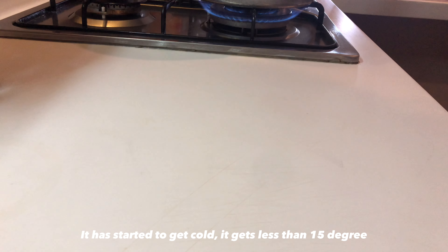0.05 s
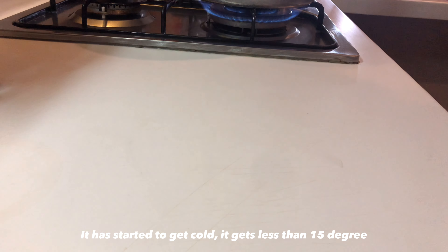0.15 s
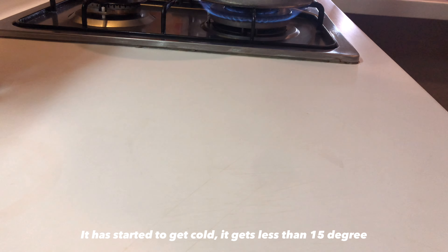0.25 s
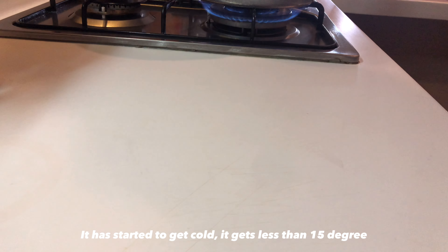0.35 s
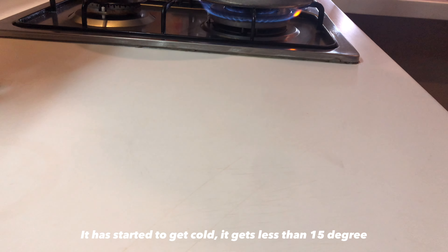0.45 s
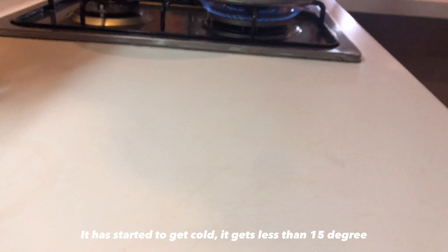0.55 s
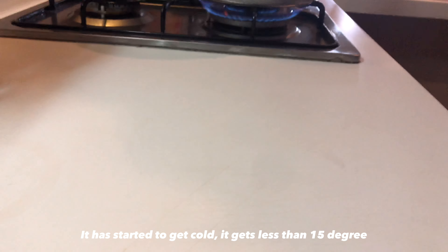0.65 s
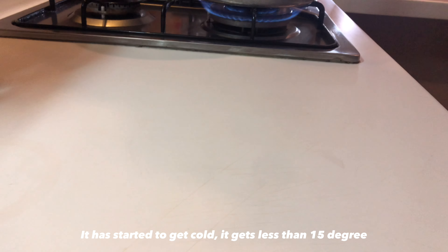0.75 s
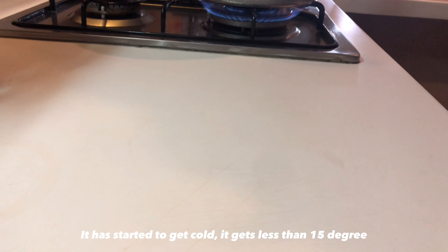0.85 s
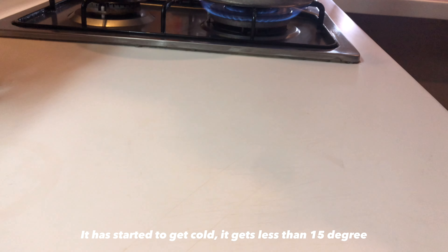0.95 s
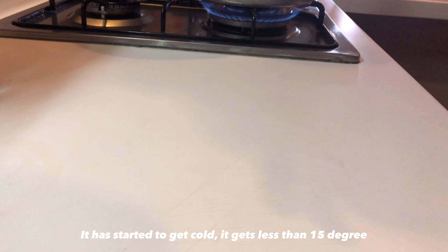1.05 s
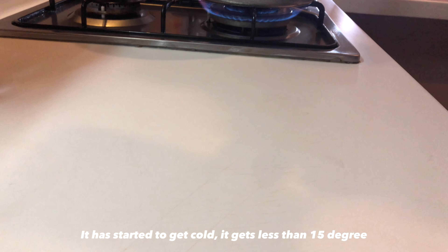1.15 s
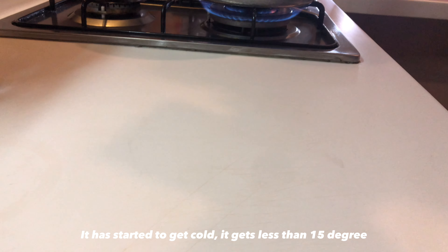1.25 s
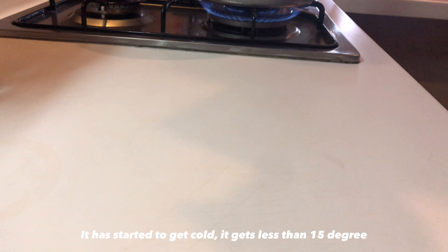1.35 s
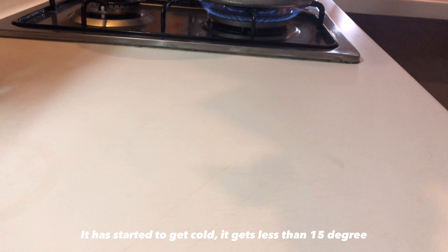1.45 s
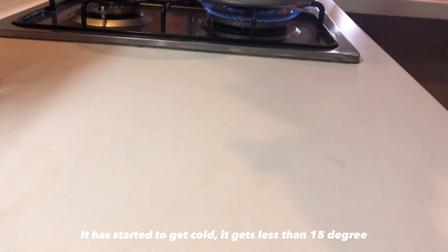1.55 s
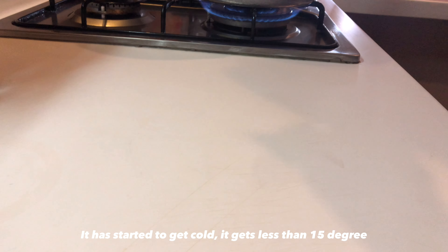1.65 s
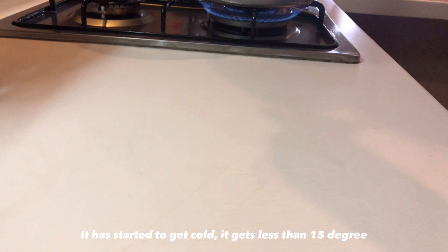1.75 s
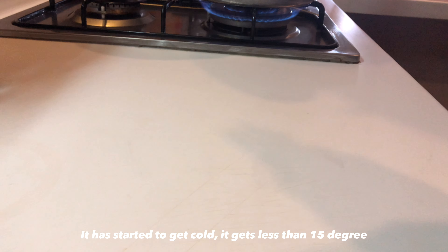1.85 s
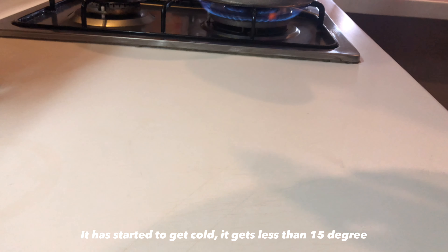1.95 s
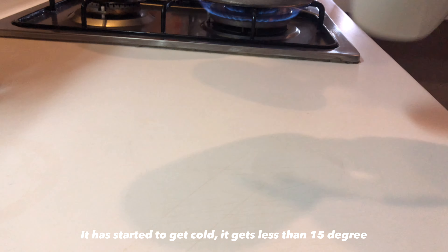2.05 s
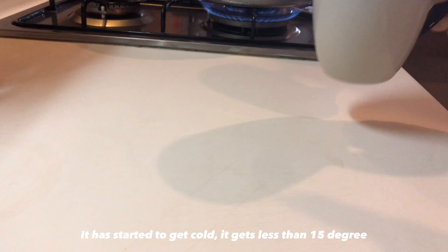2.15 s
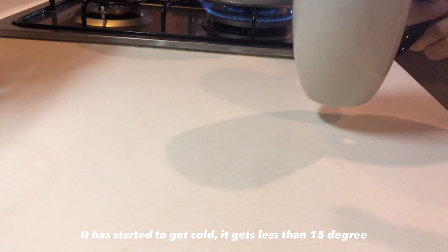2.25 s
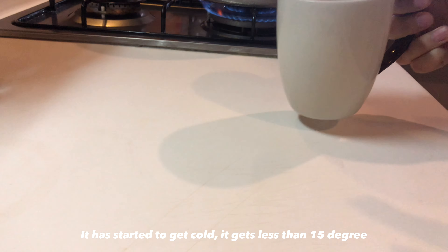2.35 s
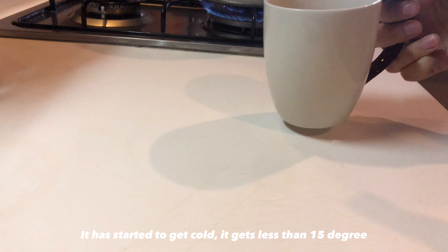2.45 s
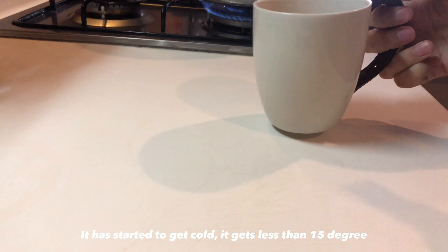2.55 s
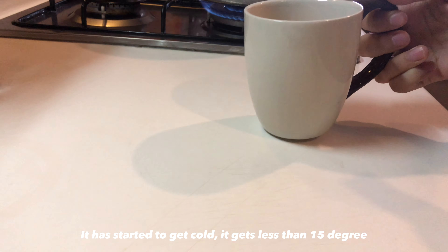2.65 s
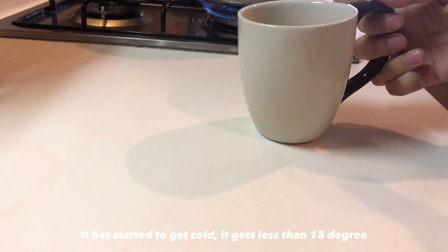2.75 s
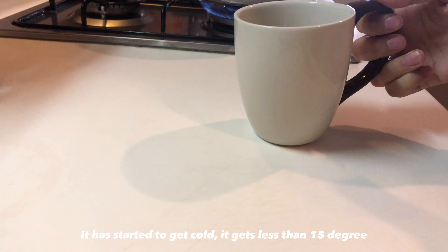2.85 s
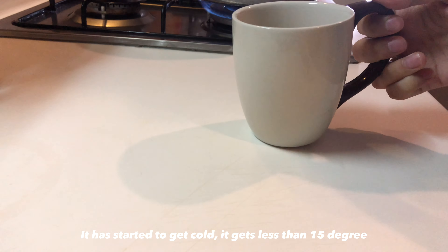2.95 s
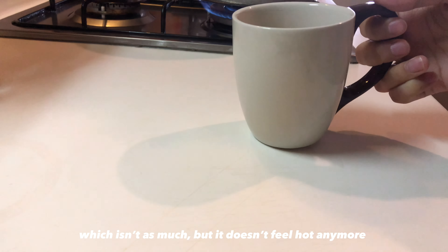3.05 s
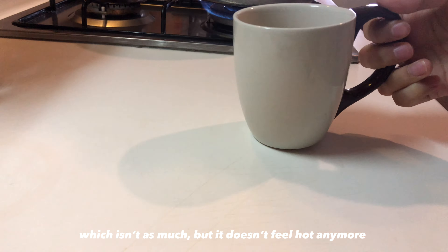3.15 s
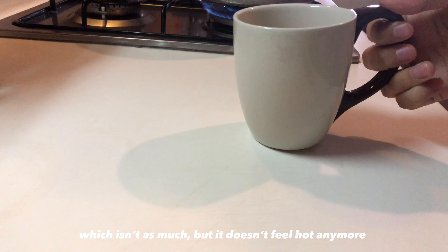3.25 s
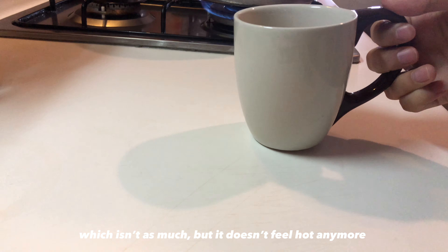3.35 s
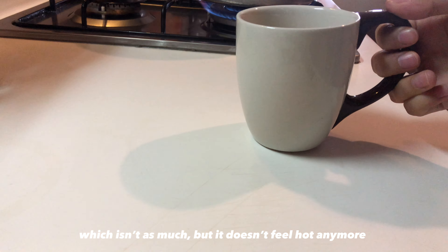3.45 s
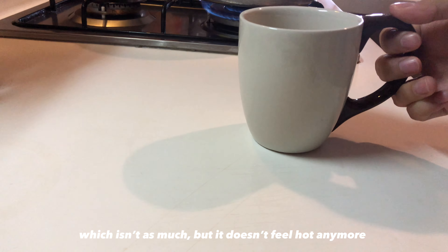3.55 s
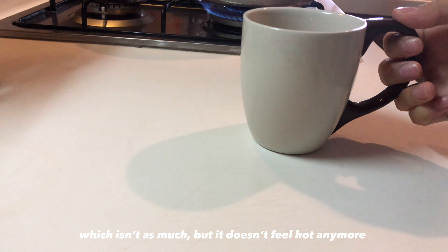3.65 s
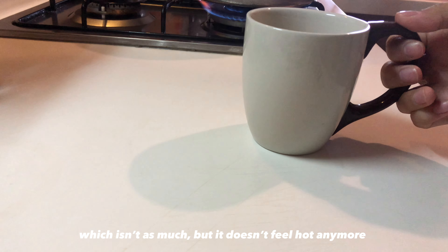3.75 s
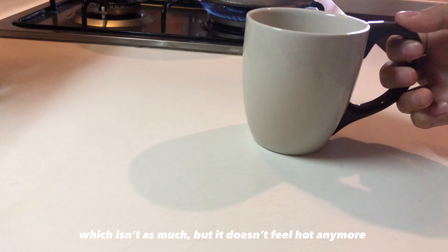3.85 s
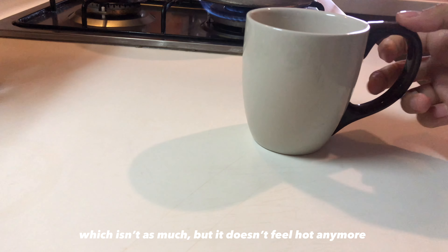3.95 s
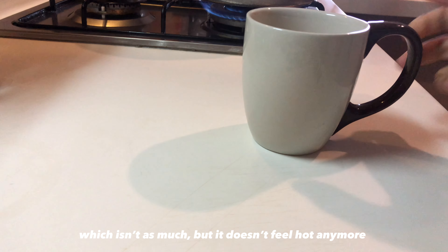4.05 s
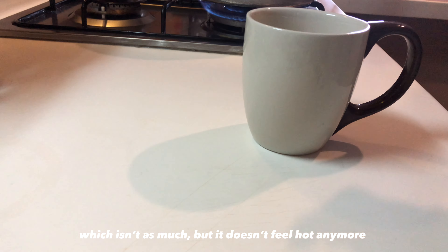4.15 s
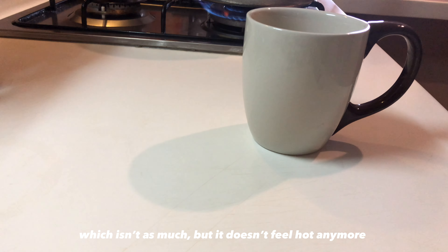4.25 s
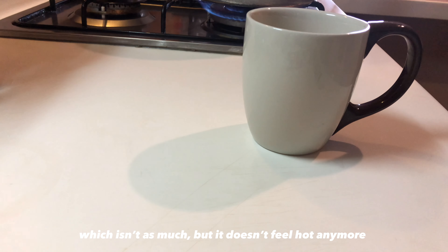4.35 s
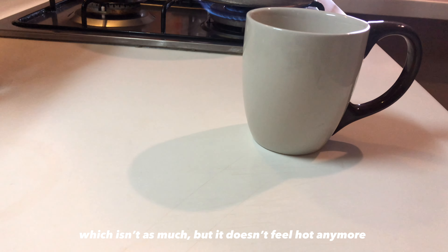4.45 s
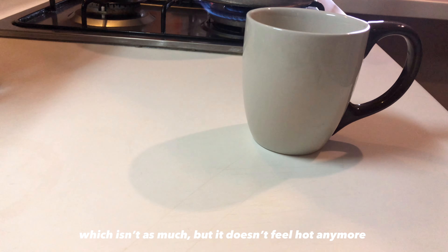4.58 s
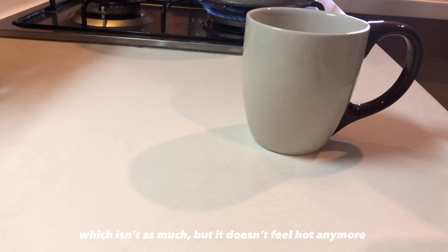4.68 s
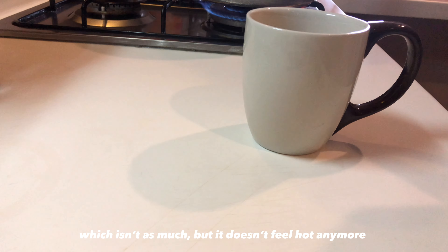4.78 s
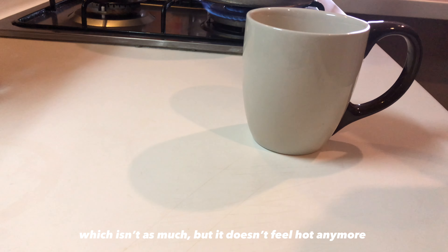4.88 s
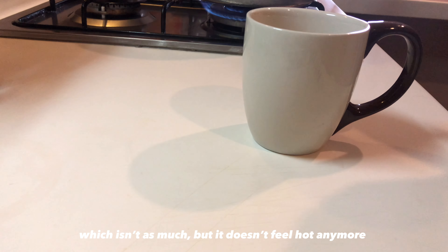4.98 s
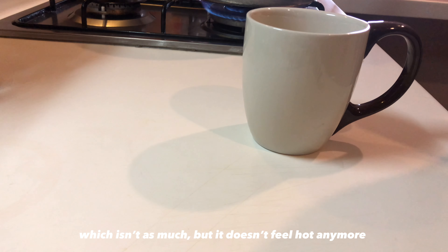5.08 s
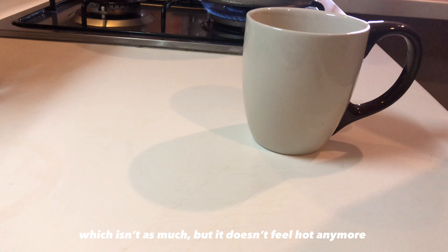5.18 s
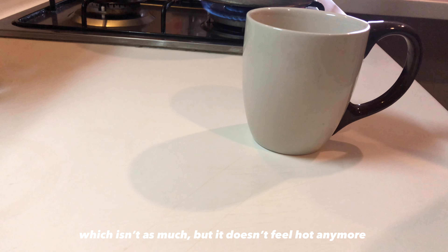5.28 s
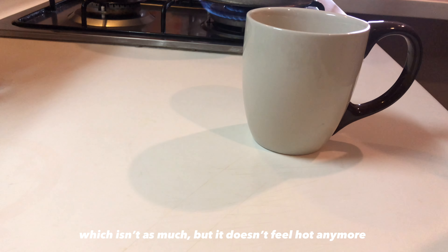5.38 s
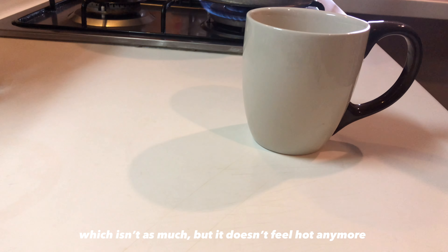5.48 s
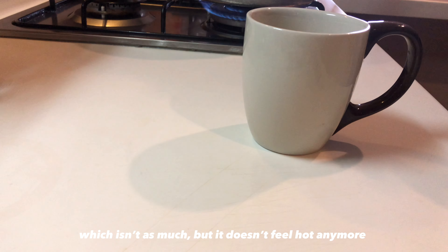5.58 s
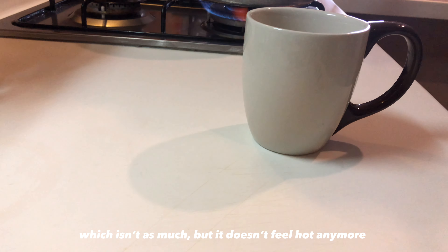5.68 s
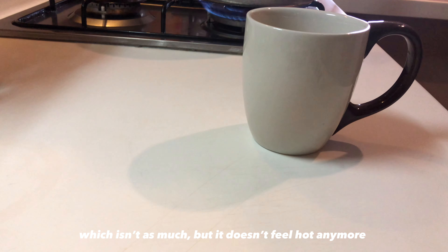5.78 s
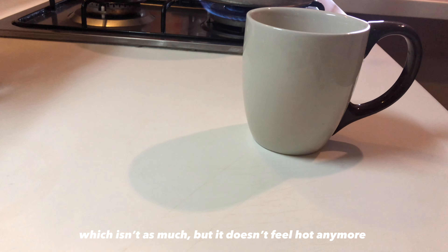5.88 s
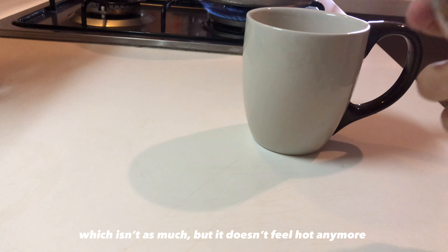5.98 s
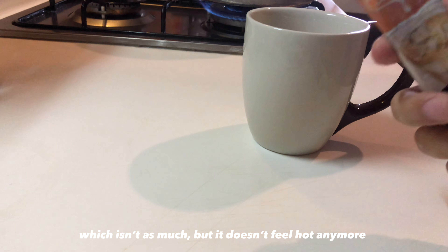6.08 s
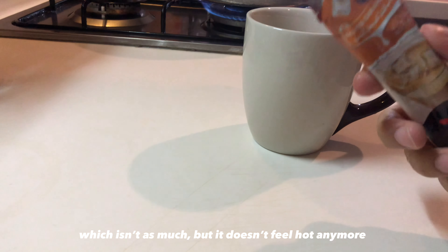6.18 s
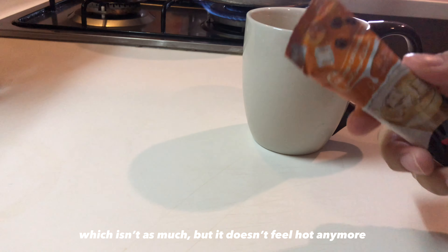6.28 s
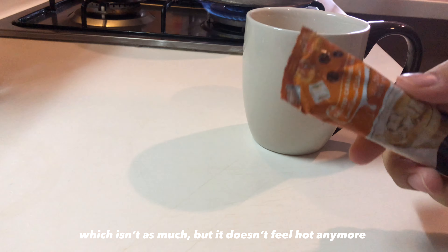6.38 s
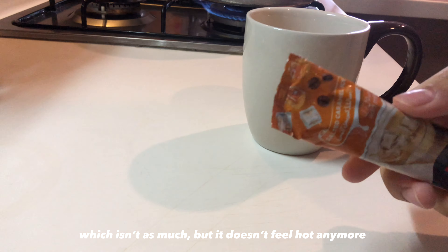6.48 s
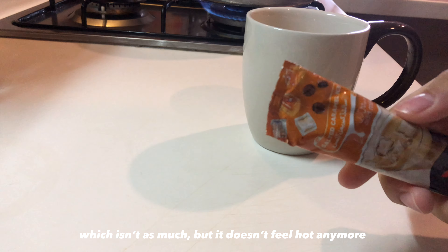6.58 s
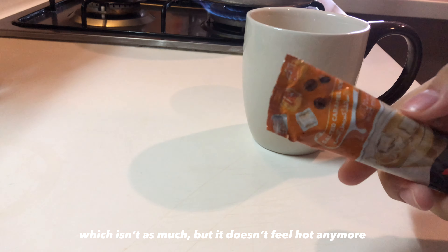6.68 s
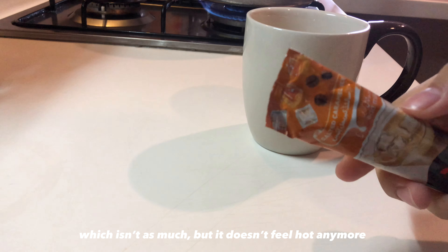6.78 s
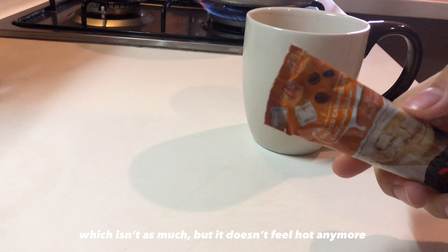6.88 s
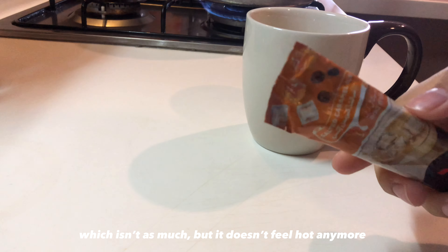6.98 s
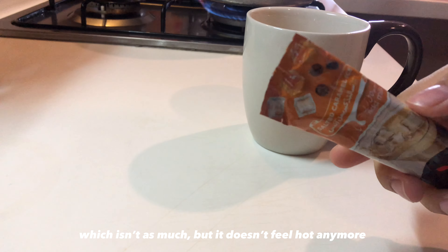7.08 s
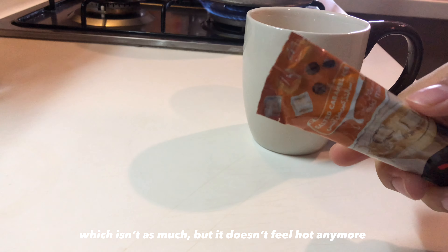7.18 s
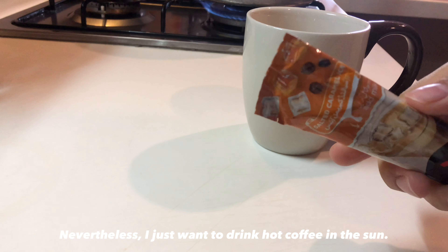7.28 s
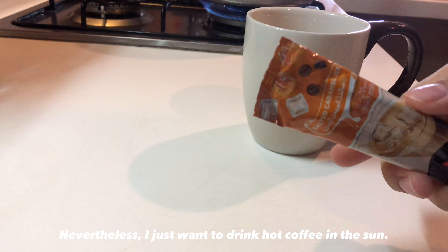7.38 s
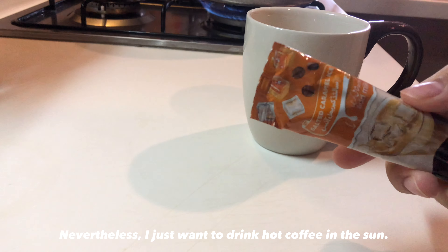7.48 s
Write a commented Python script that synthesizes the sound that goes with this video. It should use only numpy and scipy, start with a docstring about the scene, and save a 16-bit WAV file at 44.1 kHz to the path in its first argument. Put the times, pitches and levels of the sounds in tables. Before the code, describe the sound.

A gas burner hisses steadily while plastic film crackles nearby; a ceramic mug clacks onto the worktop, rocks flat, then crisp sachet crinkling bursts out.

```python
"""Kitchen counter, beside a lit gas burner: a small hard room that answers the snaps, bumps and knocks.
The flame flutters and the gas hisses as shaped noise, over faint steady hum tones.
Out of sight a plastic coffee sachet is handled: noisy bursts and short tones make each snap of the film.
Dull bumps, light taps and one distant knock are bands of noise that die away.
A ceramic mug lands on the edge of its foot and rocks flat a second later, as dying modes of mug and worktop."""
import sys
import numpy as np
from scipy import signal
from scipy.fft import rfft, irfft
from scipy.io import wavfile

SR = 44100
rng = np.random.default_rng(int(sys.argv[2]) if len(sys.argv) > 2 else 0)


def int16_out(signal):
    """Quantize to a 16-bit WAV file."""
    q = np.round(np.clip(np.atleast_2d(signal).T, -1, 1) * 32767)
    wavfile.write(sys.argv[1], SR, q.astype(np.int16))


N = 331894  # length of the scene in samples

# how long the kitchen rings on in each band: [f/Hz, t60/s]
ROOM_DECAY = [(60, 1), (200, 1), (500, 0.89), (1200, 0.51), (4000, 0.36), (15000, 0.83)]


def amp(db):
    """Turns decibels into an amplitude factor."""
    return 10 ** (np.asarray(db) / 20)


def unit(x):
    """Scales to an rms of one."""
    return x / np.sqrt(np.mean(x ** 2) + 1e-20)


def read(points, hz):
    """Joins (Hz, value) points on a log-frequency axis."""
    f, value = np.transpose(points)
    return np.interp(np.log(hz + 1), np.log(f + 1), value)


def add(mix, s, sound):
    """Mixes a sound in at time s, in seconds."""
    part = mix[round(s * SR):][:len(sound)]
    part += sound[:len(part)]


def noise(gain, size):
    """Noise of rms one whose spectrum follows the function gain(Hz)."""
    spectrum = rfft(rng.standard_normal(size))
    return unit(irfft(spectrum * gain(np.fft.rfftfreq(size, 1 / SR)), size))


def hump(hz, centre_hz, octaves):
    """A bell on the log-frequency axis."""
    return np.exp(-.5 * (np.log2((hz + 1) / centre_hz) / octaves) ** 2)


def drift(rate):
    """Slow random wavering of rms one, fading out above the rate in Hz."""
    return noise(lambda hz: np.exp(-(hz / rate) ** 2) * (hz > 0), N)


def ring(modes, t, pitch, length, rise_cycles):
    """Sums dying modes, each building up over a number of its cycles."""
    total = np.zeros(len(t))
    for hz, db, t60 in modes:
        rise = 1 - np.exp(-(t * hz / rise_cycles) ** 2)
        decay = amp(db - 60 * t / (t60 * length))
        total += decay * rise * np.sin(2 * np.pi * hz * pitch * t)
    return total


def scatter(x, decay, delay):
    """Sparse reflections of random sign, each band dying at its own speed."""
    taps = rng.choice([-1., 1.], SR) * (rng.random(SR) < 1 / 10)
    hz, t, z = signal.stft(taps, SR, nperseg=256)
    fade = amp(-60 * t / read(decay, hz)[:, None])
    tail = signal.istft(z * fade, SR, nperseg=256)[1]
    tail = np.r_[np.zeros(round(delay * SR)), tail / np.linalg.norm(tail)]
    return signal.fftconvolve(x, tail)[:N]


def soften(x, edge_hz, order=2):
    """Takes the treble off."""
    return signal.sosfilt(signal.butter(order, edge_hz, fs=SR, output="sos"), x)


def burner():
    """A fluttering flame, and gas hissing through the resonances of the mixing tube."""
    # the flame's rumble and rush, relative spectrum: [f/Hz, level/dB per Hz]
    flame_spectrum = [(25, -48), (36, -18), (48, -4), (70, -15), (110, 3.5), (132, 0), (155, -15),
                      (260, -10.5), (450, -18.5), (570, -15.5), (780, -8), (920, -6), (1300, -21.5),
                      (2500, -58.5)]
    # gas leaving the jet, relative spectrum: [f/Hz, level/dB per Hz]
    jet_spectrum = [(600, -81), (1500, 3), (2200, 0), (3000, -5.5), (3700, -6), (4700, 0.5), (5350, -2),
                    (5800, -9.5), (6500, -11), (7800, -5), (10500, -6), (12000, -13), (13000, -16),
                    (14400, -5), (15800, -19)]
    # resonances of the burner's mixing tube, on the jet's scale: [f/Hz, width/Hz, level/dB]
    tube_modes = [(2632, 132, 10), (3266, 143, 7.5), (4123, 62, 7.5), (5056, 57, 8.5), (6852, 166, 8.5),
                  (8580, 110, -3), (8855, 110, 3.5), (9624, 47, 10.5), (12130, 420, -2), (14200, 260, -3),
                  (15580, 190, -1)]
    # strength of the gas hiss: [t/s, level/dB]
    gas_level = [(0, -55.5), (2.3, -54.5), (2.8, -56), (4.2, -56), (5.6, -55.5), (7.5, -56)]
    # a sharper sizzle in the gas that falls away: [t/s, level/dB]
    sizzle_level = [(0, -64.5), (2.2, -65.5), (2.6, -88), (3.0, -80)]
    flame_db = -51.5

    def tube(hz):
        peaks = sum(amp(db) ** 2 / (1 + 2 * ((hz - f) / width) ** 2) ** 2 for f, width, db in tube_modes)
        return np.sqrt(amp(read(jet_spectrum, hz)) ** 2 + peaks)

    t = np.arange(N) / SR
    flame = noise(lambda hz: amp(read(flame_spectrum, hz)), N)
    flame *= amp(flame_db + 0.75 * drift(rate=6.8))
    hiss = noise(tube, N)
    hiss *= amp(np.interp(t, *np.transpose(gas_level)) + 0.092 * drift(rate=9.5))
    sizzle = noise(lambda hz: hump(hz, centre_hz=5100, octaves=0.072), N)
    sizzle *= amp(np.interp(t, *np.transpose(sizzle_level)))
    return flame + hiss + sizzle


def hum():
    """Steady low tones of a kitchen appliance, each a sine of random phase."""
    # faint mains hum: [f/Hz, level/dB rms]
    hum_tones = [(100, -72), (302, -69)]
    t = np.arange(N) / SR
    return sum(np.sqrt(2) * amp(db) * np.sin(2 * np.pi * (hz * t + rng.random())) for hz, db in hum_tones)


def grip():
    """Strength of the crinkling: each squeeze tightens quickly and relaxes more slowly."""
    # the fingers squeeze the sachet: [t/s at the tightest, level/dB of the crinkling]
    squeezes = [(2.13, -63), (2.41, -60), (4.53, -53), (4.69, -53), (4.82, -48), (5.089, -51.5),
                (5.43, -58), (5.66, -58.5)]
    tighten_db_per_s, relax_db_per_s = 184, 122
    t = np.arange(N) / SR
    levels = [db - np.maximum(tighten_db_per_s * (s - t), relax_db_per_s * (t - s)) for s, db in squeezes]
    return amp(np.max(levels, axis=0))


def crackle():
    """Each buckling film cracks, rings two stiff patches and sheds fizz; tiny creases follow each squeeze."""
    # crisp snaps of handled plastic: [t/s, level/dB, low ring f/Hz, high ring f/Hz, sharpness level/dB]
    snaps = [(.0718, -23.5, 3100, 4670, -14), (0.475, -25, 3080, 4350, -12), (1.6092, -29, 3670, 4860, 5),
             (1.6402, -21, 1920, 5000, -6), (2.1833, -22.5, 3140, 6700, -2),
             (2.274, -22.5, 2270, 6780, -15), (2.323, -24, 3120, 4200, 0.5), (2.5494, -15, 3400, 5550, 3.5),
             (3.582, -24, 2000, 5280, -18), (4.266, -27.5, 2180, 3820, -14), (4.4124, -28, 3450, 4000, 3.5),
             (4.4981, -15.5, 2280, 5960, -13), (4.533, -15.5, 1920, 5100, -0.5),
             (4.5686, -19, 2670, 5320, 7), (4.613, -18, 1930, 4320, 4), (4.651, -20.5, 3560, 4400, 10.5),
             (4.6625, -18, 2530, 4150, -12), (4.6774, -17, 1690, 4430, -9), (4.684, -16, 3750, 4300, -6),
             (4.6906, -16, 2650, 3870, -15), (4.752, -8.5, 1730, 4270, -6), (4.786, -17.5, 2560, 4740, -5),
             (4.7983, -17, 2370, 4660, -0.5), (4.8058, -16.5, 1680, 3660, -9),
             (4.837, -22.5, 1860, 4760, 1), (4.879, -17.5, 2320, 4180, 1), (5.0589, -25, 2350, 4800, 4),
             (5.0834, -25.5, 1700, 6630, 12), (5.0927, -19.5, 1750, 4600, 3.5),
             (5.097, -20, 2430, 5190, -2), (5.279, -28.5, 2860, 4820, 2.5), (5.414, -19, 2890, 4100, -5),
             (5.828, -15.5, 3300, 7780, 4.5), (5.9419, -26, 3570, 4860, 4.5),
             (6.4035, -31, 3270, 4540, 10.5), (6.497, -31, 3240, 6900, -5)]
    # the two rings and the fizz scale this t60, crack and flex keep their own; the spread is on a log scale
    base_t60_s, t60_spread = 0.019, 0.11
    patch_width_hz = 1720  # how far a patch's noisy ring spreads about its pitch
    fizz_db = -4  # fizz, crack and high ring all grow with sharpness
    crack_db, crack_t60_s = -5.5, 0.0039  # the instant of buckling
    creases_per_s = 690
    # faint stray snaps at any time
    strays_per_s, stray_db, stray_sharp_db = 1.2, -32.5, -2
    stray_low_hz, stray_high_hz = (2120, 3570), 4760  # range of the low ring; the high ring
    t, out = np.arange(2048) / SR, np.zeros(N)

    def burst(centre_hz, octaves, t60):
        attack = 1 - np.exp(-t / .00015)
        x = noise(lambda hz: hump(hz, centre_hz, octaves), len(t)) * attack * amp(-60 * t / t60)
        return x / np.linalg.norm(x)

    def patch(hz, t60):
        tone = np.sin(2 * np.pi * hz * t) * amp(-60 * t / t60)
        tone /= np.linalg.norm(tone)
        rough = burst(hz, octaves=np.log2(1 + patch_width_hz / hz), t60=t60)
        return amp(-3.5) * tone + amp(-2.5) * rough

    def snap(low_hz, high_hz, sharp_db):
        t60 = base_t60_s * np.exp(t60_spread * rng.standard_normal())
        fizz = amp(fizz_db) * burst(centre_hz=10500, octaves=0.98, t60=t60 * 1.2)
        flex = amp(-14.5) * burst(centre_hz=403, octaves=0.28, t60=0.12)  # the packet gives as a whole
        crack = amp(crack_db) * burst(centre_hz=7500, octaves=0.96, t60=crack_t60_s)
        low = patch(low_hz, t60 * 1.05)
        high = amp(-1.0) * patch(high_hz, t60 * 0.7)
        return low + amp(sharp_db) * (high + fizz + crack) + flex

    for s, db, low_hz, high_hz, sharp_db in snaps:
        add(out, s, amp(db) * snap(low_hz, high_hz, sharp_db))
    creases = (rng.random(N) < creases_per_s / SR) * rng.standard_normal(N)
    creases = unit(signal.oaconvolve(creases, burst(centre_hz=2860, octaves=0.94, t60=0.014))[:N])
    out = out + creases * grip()
    for at in np.flatnonzero(rng.random(N) < strays_per_s / SR):
        stray = snap(rng.uniform(*stray_low_hz), stray_high_hz, stray_sharp_db)
        add(out, at / SR, amp(stray_db) * stray)
    # the counter and the tiles close by
    near = scatter(out, [(1500, 0.096), (12000, 0.071)], delay=0.004)
    room = scatter(soften(out, edge_hz=7300), ROOM_DECAY, delay=.009)
    return out + amp(-10) * near + amp(-14.0) * room


def bumps():
    """Dull bumps and light narrow-band taps, some with much room, some nearly dry; the lower, the slower."""
    # bumps and taps about the kitchen: [t/s, peak level/dB, centre f/Hz, width/octaves, room level/dB]
    blows = [(0.255, -43, 1000, 1, 2.5), (.257, -37.5, 550, 0.19, -7.5), (.272, -45, 310, 0.2, -2),
             (.387, -42.5, 400, 1, 0), (2.549, -37, 1770, .14, -8), (2.7142, -34.5, 6050, .1, -19),
             (3.926, -41, 62, 0.18, -12), (3.988, -38.5, 446, 0.44, -14), (4.015, -45, 218, 0.26, -5),
             (5.829, -48, 445, 0.26, -10), (7.23, -45.5, 1360, .22, -16)]
    # rise and t60 hold at the reference pitch; the law is the power of pitch that shortens them
    reference_hz, rise_s, t60_s, law = 500, .003, 0.072, 0.76
    t, direct, sent = np.arange(SR) / SR, np.zeros(N), np.zeros(N)
    for s, db, centre_hz, octaves, room_db in blows:
        age = t * (centre_hz / reference_hz) ** law
        shape = (1 - np.exp(-age / rise_s)) * amp(-60 * age / t60_s)
        blow = noise(lambda hz: hump(hz, centre_hz, octaves), len(t)) * shape
        blow *= amp(db) / abs(blow).max()
        add(direct, s, blow)
        add(sent, s, amp(room_db) * blow)
    return direct + scatter(sent, ROOM_DECAY, delay=0.00814)


def distant_knock():
    """One distant knock: a bright edge that comes and dies first, over a longer low thud."""
    # relative spectrum of the knock: [f/Hz, level/dB per Hz]
    knock_spectrum = [(50, 1), (120, 14), (300, 2), (700, -8), (1200, 1.5), (2000, -2), (3000, 3.5),
                      (4900, 0), (6500, -9), (15000, -22)]
    # how fast each band dies: [f/Hz, t60/s]
    knock_decay = [(120, 0.44), (1100, 0.22), (3000, 0.062), (9000, 0.04)]
    start_s, level_db, room_db = 0.96, -35.5, -0.5
    rise_cycles = 4.4  # each band takes this long to build up, so the low thud comes last
    source = noise(lambda hz: amp(read(knock_spectrum, hz)), SR)
    hz, t, z = signal.stft(source, SR, nperseg=256)
    rise = 1 - np.exp(-(t + t[1] / 2) * hz[:, None] / rise_cycles)
    fade = amp(-60 * t / read(knock_decay, hz)[:, None])
    out = np.zeros(N)
    add(out, start_s, amp(level_db) * signal.istft(z * rise * fade, SR, nperseg=256)[1])
    return out + amp(room_db) * scatter(out, ROOM_DECAY, delay=0.0073)


def mug():
    """The hand damps the mug, so each knock is a short clack over the longer ring of the worktop."""
    # the mug meets the counter: [t/s, clack level/dB, clack pitch factor, clack ring factor, worktop level/dB]
    knocks = [(2.729, 0.5, 0.98, 1, 4.5), (3.7485, -11, 0.93, 1.83, -0.5)]
    # the foot bouncing on the hard surface, before each knock's factors: [f/Hz, level/dB, t60/s]
    clack_modes = [(468, 8.5, 0.0085), (956, 0.5, 0.016), (1026, -2.5, 0.014), (1280, -11.5, 0.016),
                   (1545, -8.5, 0.0089), (1850, -13, 0.0081), (2470, -17, 0.0077), (2760, -14.5, 0.0056),
                   (3920, -34, 0.0069)]
    # the worktop and the cupboard under it, before the factors below: [f/Hz, level/dB, t60/s]
    worktop_modes = [(60, -40, 0.36), (104, -37, 0.26), (131, -55, 0.12), (200, -42.5, 0.45),
                     (341, -26.5, 0.2), (440, -26.5, 0.082), (501, -37.5, 0.21), (592, -33.5, 0.099),
                     (680, -43, 0.072)]
    t, out, blows = np.arange(SR) / SR, np.zeros(N), np.zeros(N)
    for s, db, pitch, length, worktop_db in knocks:
        add(out, s, amp(db) * ring(clack_modes, t, pitch, length, rise_cycles=3.26))
        worktop = ring(worktop_modes, t, pitch=0.98, length=0.83, rise_cycles=1.0)
        # slow bending waves carry the low notes a little later
        add(out, s + 0.0016, amp(worktop_db) * worktop)
        add(blows, s, amp([worktop_db]))
    # the whole slab radiates the blow into the room as a broad thud
    thud = soften(blows - soften(blows, edge_hz=90, order=1), edge_hz=1250, order=5)
    # things on the counter throw it back first
    near = scatter(thud, [(200, 0.12), (1500, 0.073)], delay=.007)
    sent = amp(-15.0) * soften(out, edge_hz=750) + amp(3.0) * thud
    return out + amp(6.5) * near + scatter(sent, ROOM_DECAY, delay=.03)


def scene():
    """Everything at the counter and about the kitchen, on one channel."""
    return (burner() + hum() + crackle() + bumps() + distant_knock() + mug())[None]


def record(dry):
    """The small microphone loses the deepest bass; then the band limit takes the top."""
    thin = signal.sosfilt(signal.butter(8, 39, "high", fs=SR, output="sos"), dry)
    edge_hz = 15950
    band_limit = signal.firwin(511, edge_hz, window=("kaiser", 9), fs=SR)
    return signal.oaconvolve(thin, band_limit[None], "same")


dry = scene()
out = record(dry)
int16_out(out)
```